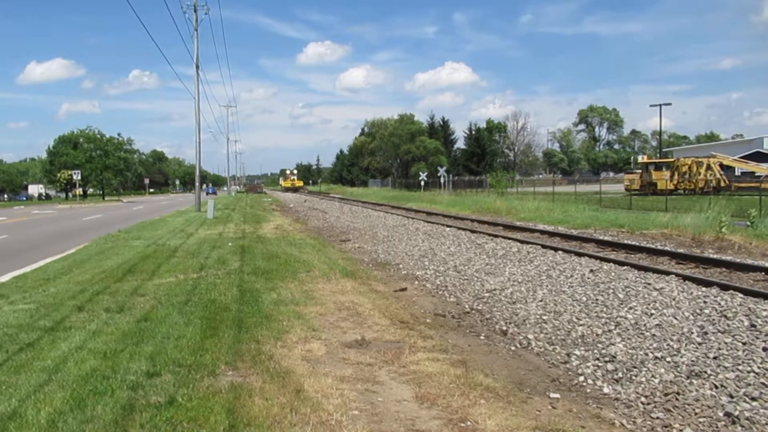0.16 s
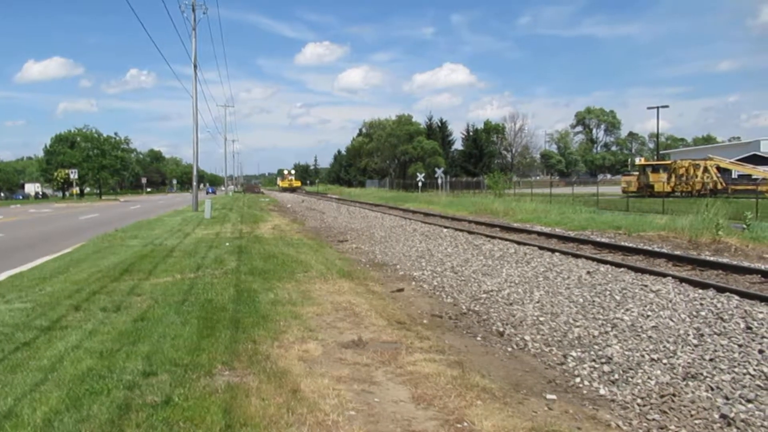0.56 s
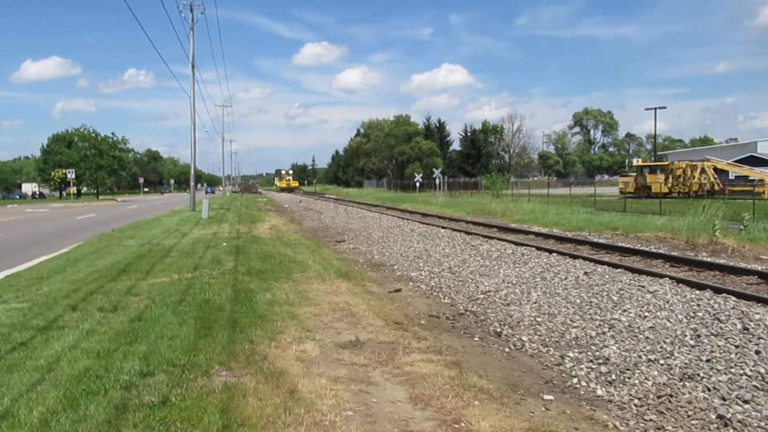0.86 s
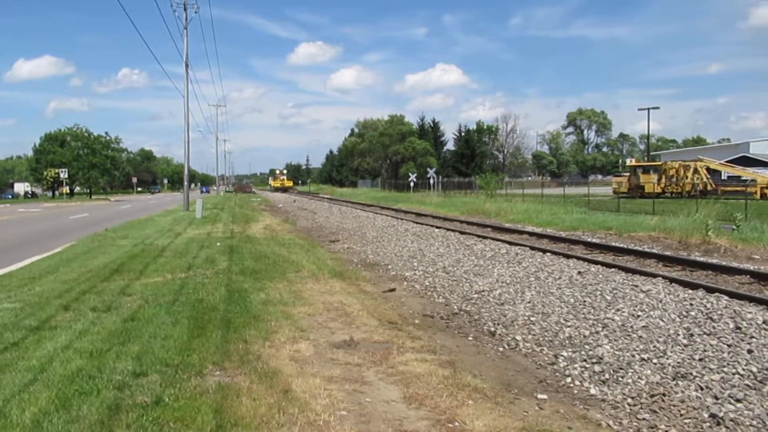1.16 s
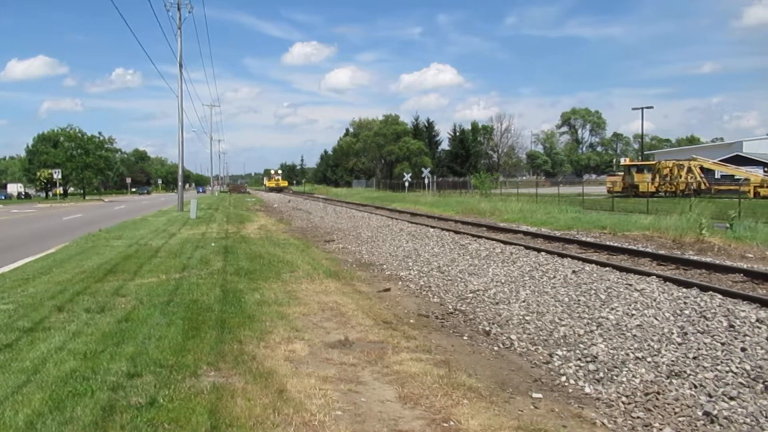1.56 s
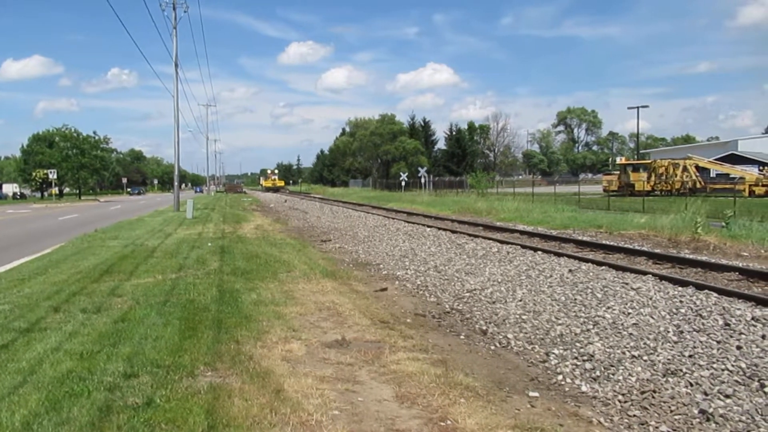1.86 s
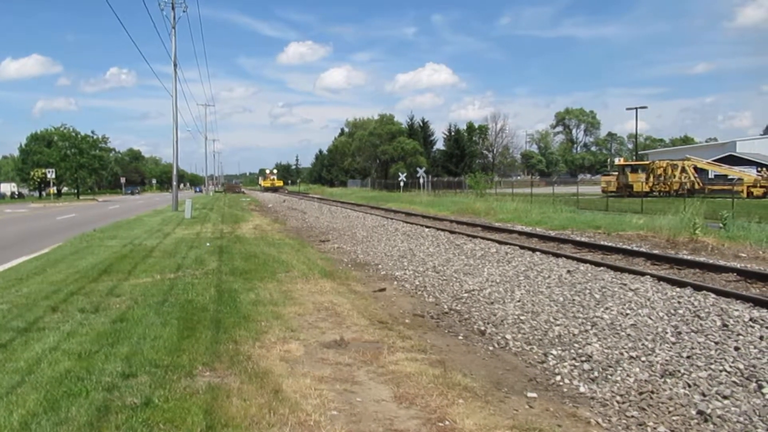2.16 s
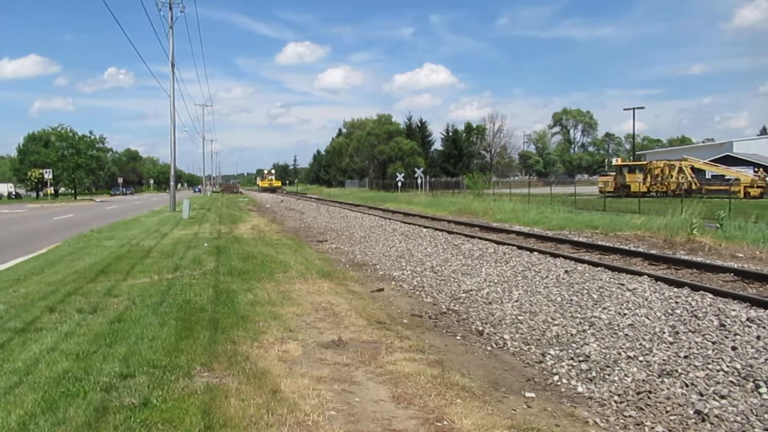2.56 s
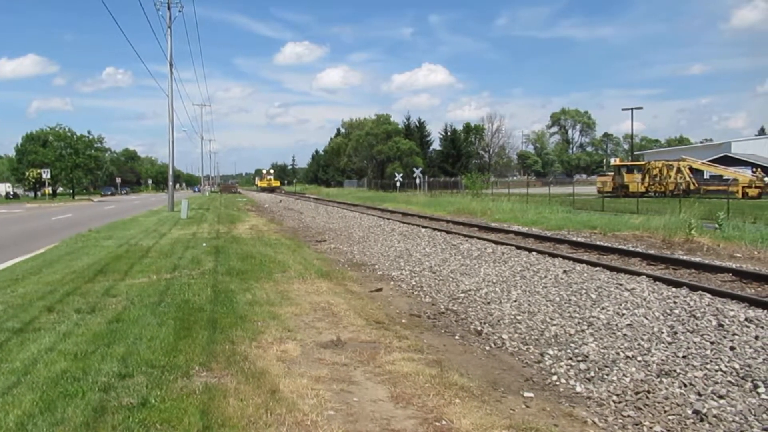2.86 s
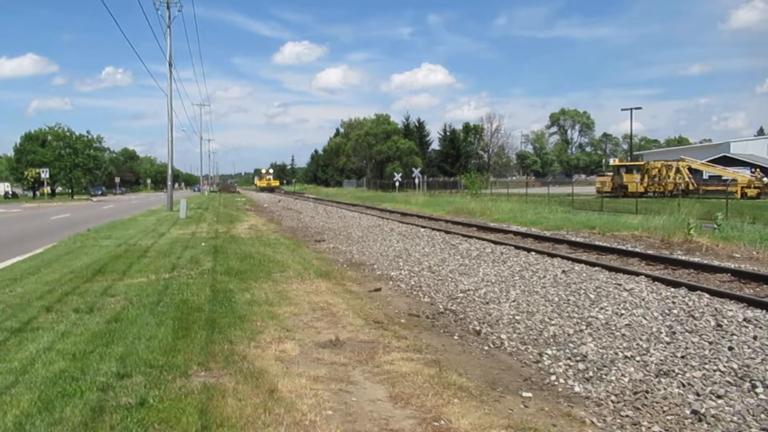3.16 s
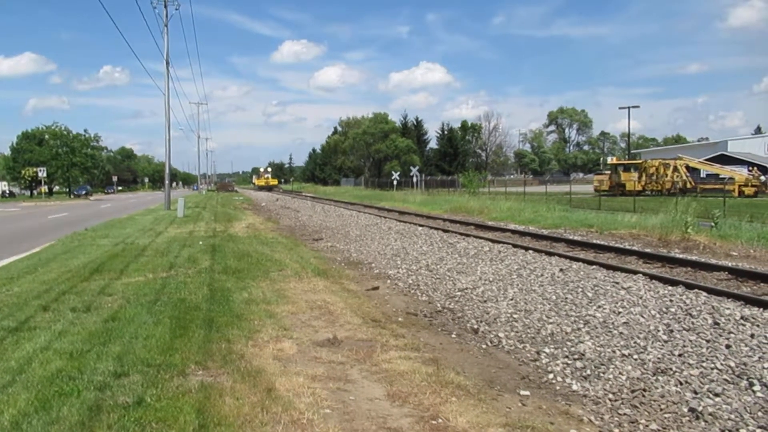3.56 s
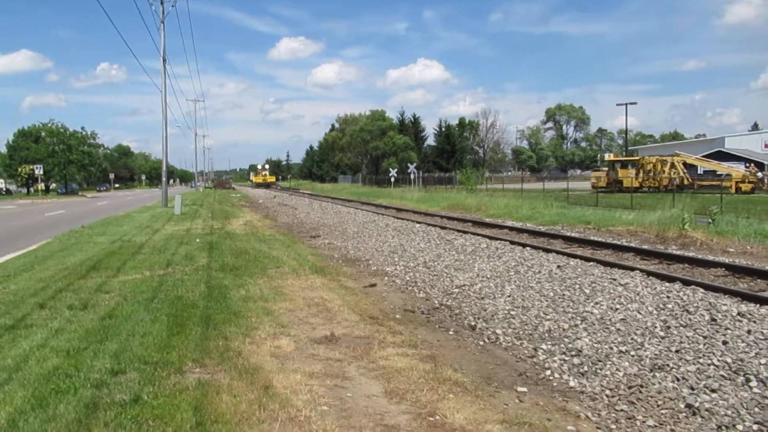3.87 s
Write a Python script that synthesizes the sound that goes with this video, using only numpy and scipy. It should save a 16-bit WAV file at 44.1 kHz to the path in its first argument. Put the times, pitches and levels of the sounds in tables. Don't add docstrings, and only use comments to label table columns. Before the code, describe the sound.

Wind buffeting dominates: after a tiny click, low thuds and flutters hit the bare microphone until 0.95 s, strongest near 0.1 and 0.55-0.8. Dull traffic roar and thin hiss show through the lull. Gusts return at 1.7-2.4. A car draws level about 2.7, tyres roaring, hissing and spraying grit, then recedes. From 3.2 the hardest gusts overload, clipping near 3.5-3.6 and ducking the road, easing by 4.

```python
import sys
import numpy as np
from scipy import signal
from scipy.fft import rfft, irfft
from scipy.io import wavfile
from scipy.ndimage import uniform_filter1d

SR = 44100
rng = np.random.default_rng(int(sys.argv[2]) if len(sys.argv) > 2 else 0)


def convert_level_to_amplitude(level_db):
    exponent = np.asarray(level_db, float) / 20
    return 10 ** exponent


def inscribe(sig):
    pcm = np.round(np.clip(np.atleast_2d(sig).T, -1, 1) * 32767)
    wavfile.write(sys.argv[1], SR, pcm.astype(np.int16))


N = 176400
T = np.arange(N) / SR
CLEAR_VIEW_S, SHADE_S = 2.74, 0.045


def read(points, hz):
    f, db = np.transpose(points)
    return np.interp(np.log(hz + 1), np.log(f + 1), db)


def evened(x):
    return x / np.sqrt(np.mean(x ** 2) + 1e-20)


def colour(x, points, octaves=0):
    hz = np.fft.rfftfreq(N, 1 / SR) / 2 ** octaves
    return irfft(rfft(x) * convert_level_to_amplitude(read(points, hz)), N)


def wander(seconds):
    size = max(int(seconds * SR), 2)
    once = uniform_filter1d(rng.standard_normal(N), size)
    return evened(uniform_filter1d(once, size))


def wash(points, patchy_db, flicker_db):
    frames = N // 128 + 5
    real, imag, patches = rng.standard_normal((frames, 257, 3)).T
    patches = uniform_filter1d(patches, 5, 0)
    patches = evened(uniform_filter1d(patches, 20, 1))
    flicker = evened(uniform_filter1d(rng.standard_normal(frames), 6))
    level = convert_level_to_amplitude(patchy_db * patches + flicker_db * flicker)
    x = signal.istft((real + 1j * imag) * level, nperseg=512, noverlap=384)[1]
    return evened(colour(x[:N], points))


# frequency_hz, level_db
FAR_ROAR = [(50, -0.1), (340, 0.6), (450, -13.5), (1080, -6.5), (1600, -13), (2100, -14), (3300, -24),
            (6000, -71.5)]
# frequency_hz, level_db
FAR_HISS = [(2000, -7), (3300, -0.5), (5000, -7), (8000, -13), (11000, -21), (15000, -29.5)]


def traffic():
    roar = convert_level_to_amplitude(-44.5) * wash(FAR_ROAR, 0.7, 0.28)
    hiss = convert_level_to_amplitude(-64) * wash(FAR_HISS, 1.2, 0.6)
    return roar + hiss


# frequency_hz, level_db
NEAR_ROAR = [(30, -9.5), (330, -6.5), (450, -7.5), (1000, -4), (1600, -11), (2300, -15.5), (2750, -22),
             (6000, -70)]
# frequency_hz, level_db
TREAD_HISS = [(1500, -27.5), (2200, -8), (3000, 0.5), (3900, -0.5), (7000, -9), (9000, -12.5), (12000, -20),
              (15000, -39.5)]
# frequency_hz, level_db
TONES = [(110, -55), (177, -55.5), (358, -56), (975, -59.5)]


def car():
    speed_m_s, distance_m, roar_lag_s = 18.1, 10, 0.31
    along_m = speed_m_s * (T - CLEAR_VIEW_S - roar_lag_s)
    near = distance_m / np.hypot(distance_m, along_m)
    seen_db = -6.5 / (1 + np.exp((T - CLEAR_VIEW_S + 0.11) / SHADE_S))
    seen_db += -3.5 * (1 - np.exp(-np.maximum(T - CLEAR_VIEW_S, 0) / 0.3))
    doppler = 1 - 0.13 * along_m * near / distance_m * speed_m_s / 343
    tones = np.zeros(N)
    for hz, db in TONES:
        throb = convert_level_to_amplitude(db + 5.0 * wander(0.04))
        pitch_hz = hz * doppler * (1 + 0.011 * wander(0.038))
        tones += throb * np.sin(2 * np.pi * np.cumsum(pitch_hz) / SR)
    roar = convert_level_to_amplitude(-41) * wash(NEAR_ROAR, 1.9, 0.9)
    hiss = convert_level_to_amplitude(-54 + seen_db) * wash(TREAD_HISS, 1.1, 0.8)
    return near * (roar + tones + hiss)


# frequency_hz, level_db
GRIT = [(3000, -32), (5000, -5.5), (7000, 0.5), (9000, -7), (11000, -19), (14000, -33.5)]


def spray():
    rise = 1 / (1 + np.exp(-(T - CLEAR_VIEW_S + 0.076) / SHADE_S))
    fade = np.exp(-np.maximum(T - CLEAR_VIEW_S, 0) / 0.25)
    return convert_level_to_amplitude(-57.5) * rise * fade * wash(GRIT, 1.2, 0.8)


# start_s, level_db
GAIN_DROPS = [
    (-.05, -9),
    (3.482, -4.5),
    (3.585, -9),
]


def duck_db():
    recover_db_s = 4.5
    total_db = np.zeros(N)
    for start_s, db in GAIN_DROPS:
        total_db += np.minimum(db + recover_db_s * (T - start_s), 0) * (T > start_s)
    return total_db


# time_s, level_db
EARLY_GUSTS = [
    [(0.0, -22), (0.02, -23.5), (0.122, -15), (0.162, -21), (0.212, -21), (0.24, -24.5), (0.25, -25)],
    [(0.25, -29), (0.264, -29), (0.36, -35), (0.384, -33.5), (0.402, -35), (0.418, -22), (0.444, -39),
     (0.478, -34), (0.5, -47)],
    [(0.5, -38.5), (0.534, -14.5), (0.6, -14.5), (0.72, -17.5), (0.756, -15), (0.766, -24), (0.782, -29.5),
     (0.8, -37)],
    [(0.8, -36), (0.822, -44.5), (0.854, -21), (0.874, -27), (0.916, -46.5), (0.944, -35.5), (0.956, -51),
     (0.966, -70), (1.0, -56)],
    [(1.08, -59), (1.088, -72), (1.112, -37), (1.164, -36), (1.182, -36.5), (1.278, -33.5), (1.298, -46),
     (1.318, -64.5), (1.34, -60)],
]
MIDDLE_GUSTS = [
    [(1.66, -63), (1.696, -26.5), (1.724, -17.5), (1.76, -19.5), (1.8, -20), (1.864, -16.5), (1.9, -27.5)],
    [(1.9, -32.5), (1.97, -16.5), (1.988, -21.5), (2.026, -20.5), (2.058, -39), (2.07, -25.5), (2.084, -19),
     (2.096, -28.5), (2.12, -20)],
    [(2.12, -13), (2.156, -30.5), (2.174, -18), (2.202, -28), (2.242, -11), (2.3, -30.5)],
    [(2.3, -21.5), (2.338, -30), (2.362, -39), (2.404, -68.5), (2.44, -31), (2.48, -83), (2.5, -43)],
]
FINAL_GUSTS = [
    [(3.19, -46), (3.208, -18), (3.232, -18), (3.3, -14)],
    [(3.3, -21.5), (3.316, -14), (3.335, -28.5), (3.348, -16.5), (3.364, -23.5), (3.396, -12), (3.42, -18)],
    [(3.42, -13), (3.438, -15.5), (3.492, -12), (3.52, -19.5)],
    [(3.52, -13.5), (3.538, -7.5), (3.562, -10), (3.578, -8), (3.588, -15.5), (3.6, -23.5)],
    [(3.6, -19), (3.616, -15.5), (3.635, -17.5), (3.692, -10), (3.712, -18), (3.75, -21)],
    [(3.75, -22.5), (3.782, -14), (3.83, -26), (3.878, -16), (3.89, -22)],
    [(3.89, -28.5), (3.914, -30), (3.936, -26), (3.952, -20.5), (3.975, -29), (4.0, -35.5)],
]
# time_s, half_length_s
FLOW_LULLS = [(0.036, 0.003), (0.239, 0.007), (0.318, 0.0052), (0.346, 0.0028), (0.398, 0.01),
              (.522, 0.0068), (0.615, 0.0023), (0.828, 0.011), (1.712, 0.0031), (1.883, 0.0077),
              (1.951, 0.0046), (2.069, 0.0052), (2.218, 0.0051), (2.273, 0.0045), (3.2, 0.0083),
              (3.242, 0.0031), (3.273, 0.0032), (3.337, 0.0076), (3.368, 0.0035), (3.414, 0.0053),
              (3.47, 0.0078), (3.527, 0.0046), (3.566, 0.0028), (3.75, 0.0048), (3.823, 0.0034),
              (3.86, 0.0053), (3.917, 0.0037), (3.928, .003)]
# time_s, speed_change_octaves
FLOW_ANGLE = [(.02, -0.35), (.12, 0.12), (.42, -0.2), (.56, 0.093), (.6, 0.18), (.74, .15), (1.8, 0.044),
              (2.3, -0.053), (3.24, -0.19), (3.5, .05), (3.7, .1), (3.9, -0.052), (3.95, -0.084),
              (3.98, -0.44)]
# frequency_hz, level_db
EDDY_PULSE = [(40, -25), (100, -5), (250, 0.64), (450, -0.5), (900, -9), (1800, -29.5), (3500, -67.5),
              (8000, -90.5)]


def buffeting():
    octaves = (-1.6, -1.5, -2.1, -0.5, 0, 0.39)
    calm_db, full_db, db_per_octave = -70, -10.5, 15.5
    gusts = EARLY_GUSTS + MIDDLE_GUSTS + FINAL_GUSTS
    time_s, level_db = np.vstack([np.array(g, float) for g in gusts]).T
    order = np.argsort(time_s, kind="stable")
    db = np.interp(T, time_s[order], np.maximum(level_db, calm_db)[order])
    calm = ((T > 1.0) & (T < 1.08)) | ((T > 1.34) & (T < 1.66)) | ((T > 2.5) & (T < 3.19))
    db = np.where(calm, calm_db, db)
    for middle_s, half_s in FLOW_LULLS:
        db += -12 * np.exp(-((T - middle_s) / half_s) ** 2)

    lump = np.minimum(wander(0.004), 1.6)
    draw, size, sign = rng.random((3, N))
    size = -np.log(size + 0.06) - 1
    speed = (db - 0.82 * duck_db() - full_db) / db_per_octave + 0.13 * lump
    speed += np.interp(T, *np.transpose(FLOW_ANGLE))
    eddies_per_s = 1100 * 2 ** np.clip(speed, octaves[0], octaves[-1])
    chance = eddies_per_s / SR
    strength = convert_level_to_amplitude(db + 1.5 * lump + 2.5 * size) / np.sqrt(chance)
    hits = (draw < chance) * np.sign(sign - 0.6) * strength
    speed = np.clip(speed + 0.27 * size, octaves[0], octaves[-1])

    unit = rng.standard_normal(N)
    out = np.zeros(N)
    for k, shift in enumerate(octaves):
        share = np.interp(speed, octaves, np.arange(len(octaves)) == k)
        out += colour(hits * share, EDDY_PULSE, shift) / np.std(colour(unit, EDDY_PULSE, shift))
    swing = 0.87
    return swing * np.tanh(convert_level_to_amplitude(0.1) * out / swing)


# time_s, peak_db, pitch_hz (negative: a
STRONG_EDDIES = [(.047, -8.5, -520), (.062, -12, 380.5), (0.099, -7.5, 1102), (0.1203, -0.5, 419.5),
                 (.127, -3, 789), (0.139, -6.5, 619), (0.1644, -10, 501), (0.192, -10, -565),
                 (0.2123, -6, -580), (0.2658, -12.5, 451), (0.4121, -13.5, -225), (0.5387, -2.5, 589.5),
                 (.546, -7.5, 901.5), (0.57, -6, 600), (.588, -4, 690.5), (0.5952, -6.5, 949.5),
                 (.601, -4.5, 298), (0.62, -3.5, 604.5), (0.640, -2.5, -340), (0.6552, -6, 478),
                 (0.6761, -7, 419), (0.6906, -3, 494), (0.7187, -5.5, -520), (0.7348, -6, 759),
                 (0.7548, -1, -240), (0.854, -15.5, 507), (0.8736, -10.5, 480), (1.7137, -7.5, -400),
                 (1.784, -9.5, -280), (1.803, -9, -565), (1.825, -11.5, 631), (1.8424, -9.5, -650),
                 (1.856, -14, -330), (1.875, -15.5, -290), (1.958, -15.5, 500), (1.969, -12, 341.5),
                 (2.009, -16.5, 332), (2.0821, -7, 307), (2.125, -9.5, -260), (2.1705, -19, 428),
                 (2.193, -17, 302.5), (2.2299, -5, 331), (2.239, -7, 404), (2.2436, -2.5, 318.5),
                 (2.2474, -3, -700), (2.266, -8.5, 526), (2.336, -13, -210),
                 (3.211, -14, 128.5), (3.226, -8.5, -480), (3.2349, -8, -250), (3.252, -4, 205.5),
               (3.2842, -2, 521), (3.291, -5.5, -260), (3.3118, -7, 184), (3.345, -10.5, 698),
               (3.3495, -12.5, -500), (3.3964, -5.5, -260), (3.422, -13.5, -335), (3.447, -2, 471.5),
               (3.468, -15, -565), (3.4807, 0.9, -520), (3.511, -5.5, -420), (3.5326, -5, 547),
               (3.573, -1, 550), (3.575, -8.5, 259.5), (3.5804, 1.6, 519.5), (3.6164, -7, 785),
               (3.671, -10.5, 518.5), (3.690, -5, -270), (3.6982, -4, 1101), (3.7269, -2.5, 1003),
               (3.742, -15, 379), (3.7676, -11.5, 363), (3.792, -11, 487), (3.8073, -14.5, 328),
               (3.833, -13, 499), (3.852, -14.5, 800), (3.875, -9.5, 465.5), (3.931, -17.5, 597.5),
               (3.946, -9.5, 513.5)]
# frequency_hz, level_db
PORT_RESPONSE = [(25, -17), (60, 0.97), (3000, 0.27), (5500, 0), (9000, -37)]


def with_kicks(wind):
    kicks = np.zeros(N)
    for time_s, db, hz in STRONG_EDDIES:
        turns = (T - time_s) * abs(hz)
        wind = wind * (1 - 0.9 * np.exp(-(turns / 1.3) ** 2))
        pulse = np.cos(2 * np.pi * turns * 0.93 + 0.45) / (1 + (turns / 0.45) ** 2) ** 2
        kicks -= np.sign(hz) * convert_level_to_amplitude(db) * pulse
    return colour(wind + kicks, PORT_RESPONSE)


def scene():
    wind = with_kicks(buffeting())
    road = car() + spray() + traffic()
    return (wind + convert_level_to_amplitude(duck_db()) * road)[None]


# frequency_hz, level_db
INPUT_HISS = [(3000, -29), (6000, -2.5), (9000, -3.5), (12500, -8), (15000, -11)]


def low_pass(x):
    return signal.sosfilt(signal.butter(12, 15300, fs=SR, output="sos"), x)


def record(dry):
    tick = convert_level_to_amplitude(-18.5) * np.exp(-T / 0.00047)
    hiss = convert_level_to_amplitude(-81) * evened(colour(rng.standard_normal(N), INPUT_HISS))
    loaded = np.clip(dry + tick + hiss, -1, 1)
    return low_pass(loaded)


dry = scene()
out = record(dry)
inscribe(out)
```